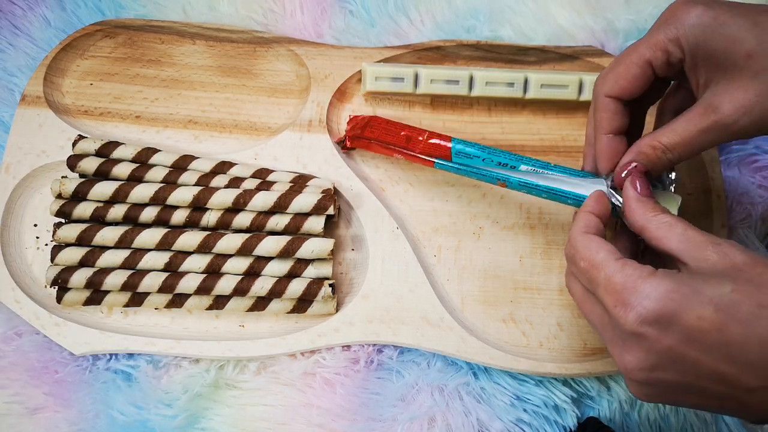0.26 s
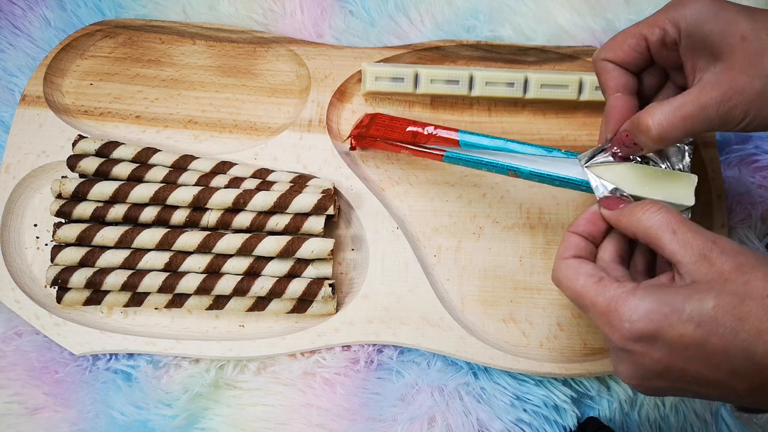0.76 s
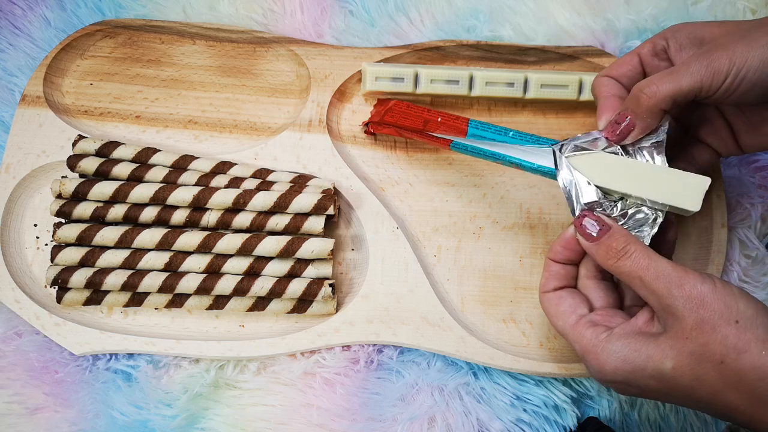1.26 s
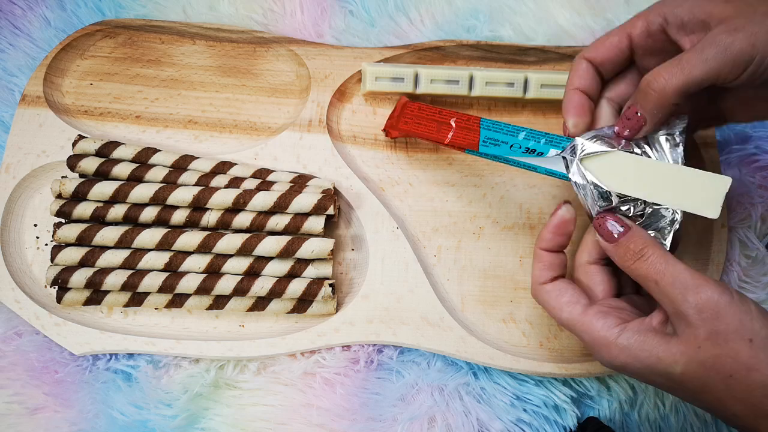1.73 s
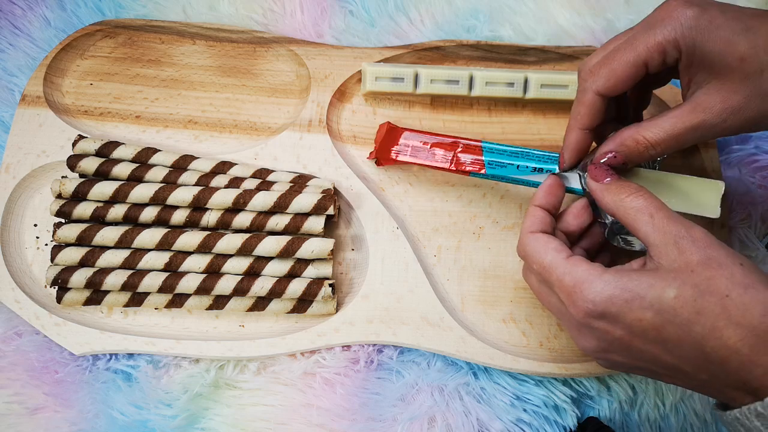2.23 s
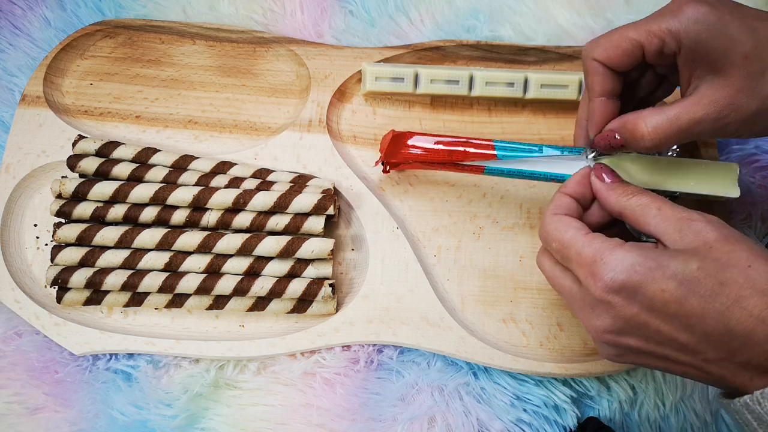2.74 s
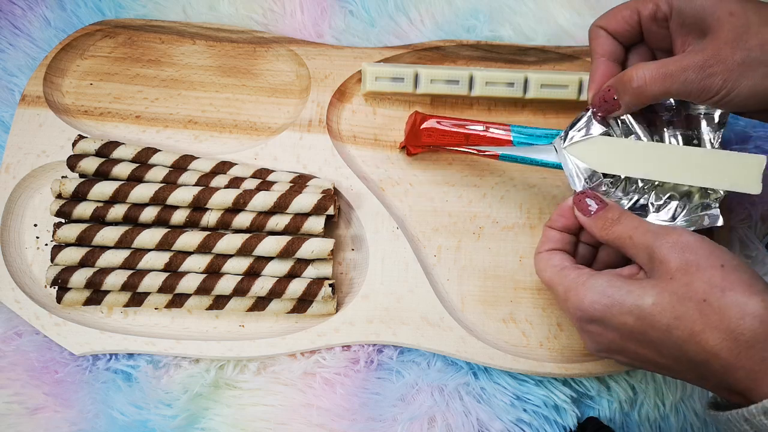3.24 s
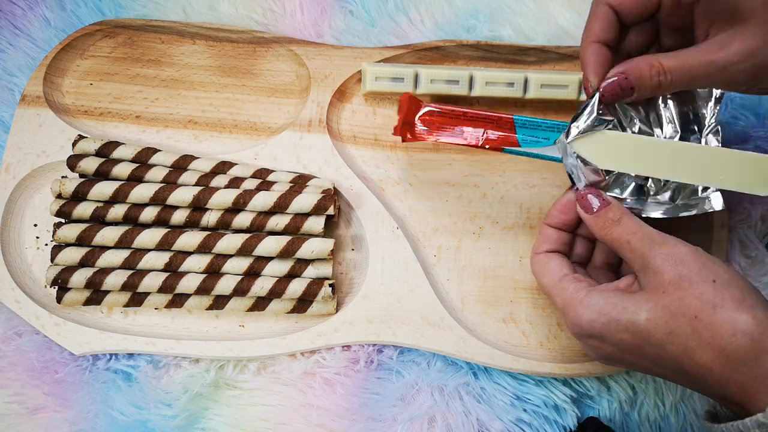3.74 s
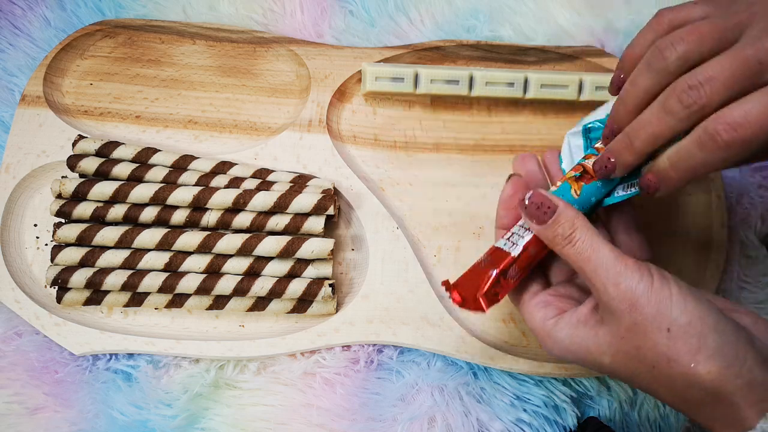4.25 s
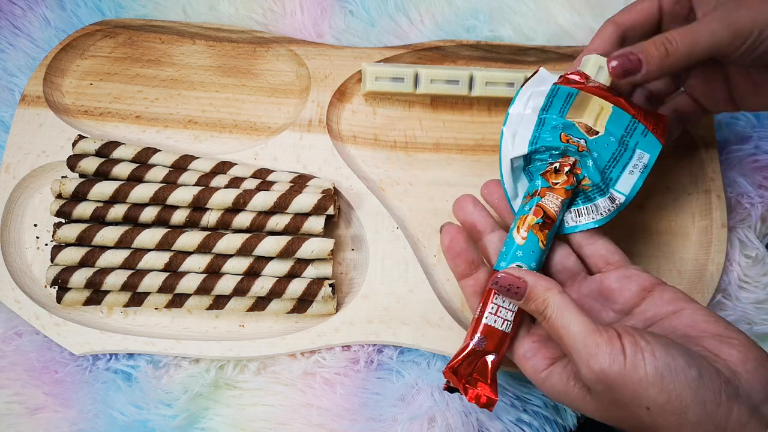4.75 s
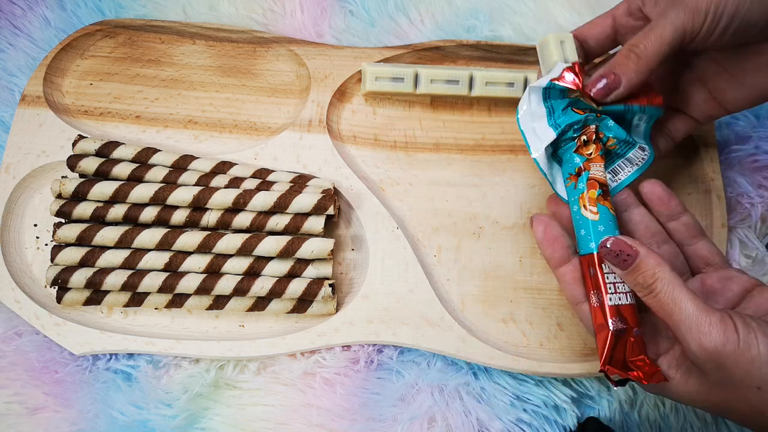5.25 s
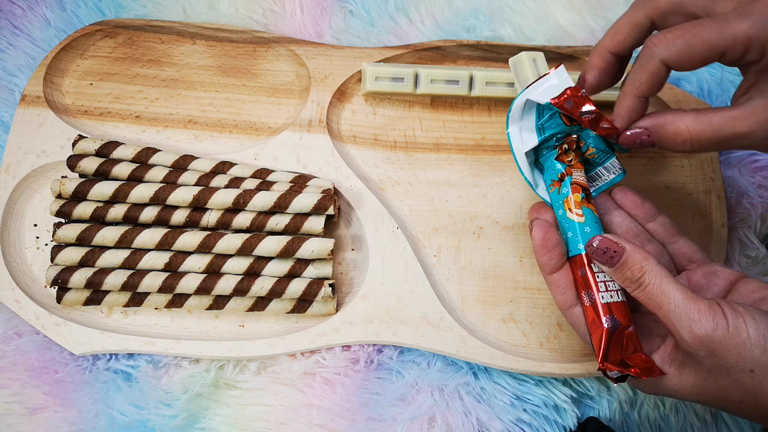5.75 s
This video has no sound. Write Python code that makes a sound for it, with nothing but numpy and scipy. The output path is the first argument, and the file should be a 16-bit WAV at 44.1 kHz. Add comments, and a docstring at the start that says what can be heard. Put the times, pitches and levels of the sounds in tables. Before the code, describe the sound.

Crisp dry snaps and fine ticking of metallised film, heard very close in stereo with a short bright room tail. Crinkling builds quickly, the seam tears briefly, loud creases pop around the middle, then a calmer stretch with faint rustles and low handling thuds before a final loud crumple. Beneath it are quiet air and two distant soft dove phrases.

```python
"""Sharp snaps and fine crackle, close to a stereo microphone in a small room: two hands peel a stiff
metallised wrapper off a chocolate bar. Creases flip with a crack and a short ring, tiny wrinkles tick
in between, and the seam tears once in a quick run of ticks. Under it low noise follows the hands as they
press on the table, skin rubs along the bar and fingertips bump a ringing board.
Far outside a dove coos two phrases of gliding, almost pure notes."""
import sys
import numpy as np
from scipy import signal
from scipy.fft import rfft, irfft, next_fast_len
from scipy.io import wavfile
from scipy.ndimage import uniform_filter1d, minimum_filter1d

SR = 44100
rng = np.random.default_rng(int(sys.argv[2]) if len(sys.argv) > 2 else 0)


def pcm_store(signal):
    """Save signal as 16-bit PCM."""
    levels = np.round(np.clip(np.atleast_2d(signal), -1, 1) * 32767)
    wavfile.write(sys.argv[1], SR, levels.astype(np.int16).T)


N = 264157
TIME = np.arange(N) / SR
SNAP_SIZE = 220   # samples in one buckle

# the free facet of film, lower as it opens and purer when taut: start_s, pitch_hz, tautness (0-1)
FACET_CURVE = [(.7, 2014, 0.27), (1.0, 2684, 0.4), (1.15, 2740, 0.95), (1.3, 2400, 1), (1.37, 1860, 0.5),
               (1.45, 1630, 0.55), (1.57, 1540, 0.71), (1.7, 1580, 0.05), (2.2, 1792, 0), (3.1, 1920, 0.38),
               (5.7, 1460, 0.01)]


def from_db(db):
    """Decibels to gain."""
    return 10 ** (np.asarray(db) / 20)


def rms_one(x):
    """Each row scaled to rms 1."""
    return x / np.sqrt(np.mean(x ** 2, axis=-1, keepdims=True) + 1e-20)


def at_time(rows, t):
    """The columns of a curve at times t."""
    s, *columns = np.transpose(rows)
    return [np.interp(t, s, c) for c in columns]


def at_hz(points, hz):
    """A spectrum read on a log-frequency axis."""
    f, value = np.transpose(points)
    return np.interp(np.log(hz + 1e-3), np.log(f), value)


def band(x, low_hz, high_hz, order=2):
    """Butterworth band-pass."""
    edges = [low_hz, min(high_hz, SR / 2 - 1)]
    return signal.sosfilt(signal.butter(order, edges, "band", fs=SR, output="sos"), x)


def colour(x, spectrum):
    """Give x a smooth frequency response; minimum phase, so that nothing sounds before a snap."""
    size = 2 * next_fast_len(N // 2 + SNAP_SIZE * 20)
    magnitude = from_db(at_hz(spectrum, np.fft.rfftfreq(size, 1 / SR)))
    cepstrum = irfft(np.log(magnitude))
    # keeping only the causal half of the cepstrum makes the phase minimum
    response = np.exp(2 * rfft(cepstrum[:size // 2], size) - cepstrum[0])
    return irfft(rfft(x, size) * response, size)[..., :N]


def held_db(rows, t, attack_s, release_s, resting_db):
    """Levels at times t of moves that build up, hold and let go; one result for each resting level given."""
    start, end, *columns = np.transpose(rows)[:, :, None]
    build_up = np.clip((t - start) / attack_s, 0, 1)
    power_shape = (build_up * np.exp(-np.maximum(t - end, 0) / release_s)) ** 2
    levels = []
    for db, rest in zip(columns, resting_db):
        power = from_db(db[:, 0]) ** 2 @ power_shape + from_db(rest) ** 2
        levels.append(10 * np.log10(power))
    return levels


def still_air():
    """The quiet of the place: steady coloured noise, independent at each capsule."""
    # relative spectrum of the air: frequency_hz, density_db (per Hz)
    quiet = [(30, -12), (120, -8), (300, -7), (800, -10.5), (2000, -9.5), (8000, -35), (11000, -46.5)]
    return from_db(-67.5) * rms_one(colour(rng.standard_normal((2, N)), quiet))


def dove():
    """Short, long, short: almost pure notes that arch and sink, wavering a little with distance."""
    # the notes: start_s, length_s, first_hz, middle_hz, last_hz, level_db
    notes = [(1.11, 0.12, 515, 537, 500, -66.5), (1.324, 0.47, 512, 528.5, 475, -66),
             (1.94, 0.21, 525, 518, 476, -65.5), (3.627, 0.13, 515, 523, 520, -65.5),
             (3.842, 0.388, 525, 524, 494, -62), (4.482, .16, 525, 508, 497, -65)]
    out = np.zeros(N)
    for start, length, first_hz, middle_hz, last_hz, level_db in notes:
        u = np.clip((TIME - start) / length, 0, 1)
        hz = np.polyval(np.polyfit([0, .5, 1], [first_hz, middle_hz, last_hz], 2), u)
        swell = np.sqrt(2 * np.abs(np.sin(np.pi * u)))
        out += from_db(level_db) * swell * np.sin(2 * np.pi * np.cumsum(hz) / SR)
    waver = 1 + .25 * rms_one(band(rng.standard_normal((2, N)), 10, 20))
    return out * waver * from_db([[-1.5], [1.5]])     # a little louder on the right


def rumble(spectrum, side_db):
    """Coloured noise with its slow swells evened out; side_db sets how far the capsules differ."""
    mid, side = rms_one(colour(rng.standard_normal((2, N)), spectrum))
    swell = np.sqrt(uniform_filter1d(mid ** 2, size=SR // 8) + 1e-6)
    return mid / swell + from_db(side_db) * side * [[1], [-1]]


def handling():
    """The hands rock the table, thud softly on it and rub along the bar: three noises under moving levels."""
    # the hands press on the table: start_s, end_s, sway_db, thud_db
    presses = [(-0.05, 0.04, -40.5, -47), (0.2, 0.42, -48.5, -48.5), (0.6, 0.96, -45.5, -52),
               (1.22, 1.68, -43.5, -55), (1.95, 2.33, -45, -52), (2.76, 3.22, -48, -55),
               (3.33, 3.64, -39.5, -57), (3.77, 4.08, -37, -51.5), (4.38, 4.72, -44, -48),
               (4.9, 5.16, -44.5, -53), (5.26, 5.53, -52, -51), (5.67, 5.82, -39, -32.5),
               (5.87, 5.99, -43, -40)]
    # skin rubbing along the bar: start_s, length_s, level_db
    rubs = [(0.244, 0.15, -65), (2.807, 0.15, -60), (4.41, 0.12, -61.5), (5.638, 0.19, -52),
            (5.778, 0.12, -52.5), (5.913, 0.1, -49.5)]
    # relative spectra of rocking, thudding and rubbing: frequency_hz, density_db (per Hz)
    sway_spectrum = [(12, -4.5), (22, 5), (28, 16), (36, 7), (50, -14.5), (70, -54), (200, -88.5)]
    thud_spectrum = [(40, -38.5), (60, -7.5), (75, 0.5), (88, -7), (102, -7.5), (113, -13.5), (128, -7.5),
                     (152, -21.5), (175, -27), (200, -21), (250, -23), (320, -32.5), (600, -48.5),
                     (1200, -58.5), (5000, -82.5)]
    skin_spectrum = [(120, -9.5), (280, -4.5), (430, -3), (700, -10.5), (1200, -11.5), (5000, -36.5),
                     (12000, -48.5)]
    sway_db, thud_db = held_db(presses, TIME, attack_s=0.043, release_s=0.045, resting_db=[-51.5, -56])
    strokes = np.zeros(N)
    for start, length, db in rubs:
        strokes += from_db(db) * np.sin(np.pi * np.clip((TIME - start) / length, 0, 1))
    swaying = from_db(sway_db) * rumble(sway_spectrum, side_db=-41.5)
    thudding = from_db(thud_db) * rumble(thud_spectrum, side_db=-37)
    rubbing = strokes * rumble(skin_spectrum, side_db=-1.5)
    return swaying + thudding + rubbing


def bumps():
    """Soft blows of the fingertips set the wooden board ringing for a few cycles."""
    # a fingertip bumps the board: start_s, level_db
    blows = [(3.175, -49), (4.441, -52), (5.70, -44), (5.749, -37.5), (5.83, -43)]
    board_hz, attack_s, decay_s = 145.7, 0.0076, .035
    s, level_db = np.transpose(blows)
    t = np.maximum(TIME - s[:, None], 0)
    ring = np.sin(2 * np.pi * board_hz * t) * (1 - np.exp(-t / attack_s)) * np.exp(-t / decay_s)
    return from_db(level_db) @ ring


def band_levels(flap_db, treble_db, brightness_db):
    """Levels of flap, crack, sizzle and air: brightness moves treble from crack to sizzle and raises the air."""
    crack_db = treble_db - 10 * np.log10(1 + from_db(brightness_db) ** 2)
    sizzle_db = crack_db + brightness_db     # crack and sizzle together carry the treble level
    air_db = treble_db - 11.5 + 0.79 * brightness_db
    return [flap_db, crack_db, sizzle_db, air_db]


def buckles(times, flap_hz, ridge_hz, levels_db, pan_db, flap_decay_s, crack_decay_s, ridge_decay_s,
            ridge_db, alike, lead_s):
    """Each crease flips in about a millisecond: the treble cracks, its facet and stiff ridge ring briefly."""
    # bands of crack, sizzle and air: low_hz, high_hz
    crack_bands = [(2500, 5500), (5500, 10000), (10000, 15500)]
    t = np.arange(SNAP_SIZE) / SR
    # axes: crease, band, (shared, left, right), sample
    chance = rng.standard_normal((len(times), 4, 3, SNAP_SIZE))
    alike = np.clip(alike, 0, 1)     # share of noise power common to both capsules
    grit = np.sqrt(alike) * chance[:, :, :1] + np.sqrt(1 - alike) * chance[:, :, 1:]
    fade_out = np.minimum(1, 10 * (1 - t / t[-1]))
    onset = (1 - np.exp(-(t / 0.0004) ** 2)) * fade_out

    flap_tone = np.sin(2 * np.pi * (flap_hz[:, None, None] * t + chance[:, 0, :1, :1]))
    flap_noise = 0.52 * rms_one(band(grit[:, 0], 900, 3060))
    flap = (flap_tone + flap_noise) * onset * np.exp(-t / flap_decay_s)
    shapes = rms_one(band(flap, 752, 3600, order=4)) * from_db(levels_db[0])[:, None, None]

    ridge_tone = np.sin(2 * np.pi * (ridge_hz[:, None, None] * t + chance[:, 1, :1, :1]))
    ridge = ridge_tone * onset * np.exp(-t / ridge_decay_s)
    flip = onset * (np.exp(-t / crack_decay_s) + 0.064)     # the sheet shivers on after the flip
    for k, (edges, level_db) in enumerate(zip(crack_bands, levels_db[1:])):
        crack = band(grit[:, k + 1] * flip + from_db(ridge_db) * ridge, *edges, order=4)
        shapes = shapes + rms_one(crack) * from_db(level_db)[:, None, None]

    out = []
    lead = lead_s + .00003 * chance[:, 1, 0, -1]     # the wrapper is a little nearer the right capsule
    for channel, side in enumerate((1, -1)):     # left, right
        first = np.round((times - .0001 + side * lead / 2) * SR).astype(int)
        at = first[:, None] + np.arange(SNAP_SIZE)
        panned = shapes[:, channel] * from_db(side * pan_db / 2)[:, None]
        out.append(np.bincount(np.maximum(at, 0).ravel(), panned.ravel(), N)[:N])
    return np.array(out)


def crackle(count=2300):
    """Hundreds of tiny wrinkles a second give way, most weak, a few strong; taut film shares one pitch."""
    # the fingers grip and work the film: start_s, end_s, flap_db, treble_db, brightness_db (sizzle over crack)
    grips = [(0.029, 0.086, -51, -46.5, 0), (0.216, 0.333, -59, -54.5, -1.5),
             (0.424, 0.468, -54, -46.5, -5), (0.609, 0.63, -70.5, -34.5, 17), (0.63, 0.736, -43, -36, -11),
             (0.789, 0.99, -39, -36.5, 0), (0.968, 1.146, -37.5, -28.5, 5), (1.127, 1.318, -47.5, -42, -2),
             (1.342, 1.583, -42.5, -37, -0.5), (1.647, 1.844, -39, -35.5, -0.5),
             (1.852, 1.972, -33.5, -30.5, -8), (2.092, 2.238, -45.5, -41, -3.5),
             (2.404, 2.47, -61.5, -59, -0.5), (2.592, 2.758, -58.5, -48.5, 5), (2.767, 2.914, -43, -38, 2),
             (2.96, 3.15, -44.5, -38, -2), (3.16, 3.248, -54.5, -57, 1.5), (3.31, 3.457, -56, -39.5, 0),
             (3.602, 3.627, -46.5, -38, -1), (3.747, 3.908, -49.5, -41.5, 4),
             (4.127, 4.168, -81.5, -59, -11.5), (4.356, 4.491, -54, -62.5, 2.5),
             (4.636, 4.72, -63.5, -61, 2), (4.865, 4.949, -54.5, -46, 8), (5.063, 5.124, -68, -61.5, 6),
             (5.136, 5.262, -55, -65, -1), (5.267, 5.394, -41.5, -40.5, 1), (5.438, 5.515, -53.5, -58, 9),
             (5.646, 5.681, -33, -33.5, 2), (5.81, 5.99, -35.5, -37.5, 4.5)]
    idle_db = -78     # film that is only held still ticks faintly
    s = (np.arange(count) + rng.uniform(-1, 1, count)) / count * N / SR
    size, pitch, overtone, tilt, pan = rng.standard_normal((5, count))
    size_db = 6.55 * np.minimum(size, 1.8) - 8.5
    grip_db = held_db(grips, s, attack_s=0.012, release_s=0.028, resting_db=[idle_db, idle_db])
    flap_db, treble_db = grip_db + size_db
    start, end, *_, grip_brightness_db = np.transpose(grips)
    brightness_db = np.interp(s, (start + end) / 2, grip_brightness_db) + 2.5 * tilt
    facet_hz, taut = at_time(FACET_CURVE, s)
    slack = 1 - np.clip(taut, 0, 1)     # slack film scatters the pitches
    flap_hz = facet_hz * np.exp(0.34 * slack * np.maximum(pitch, -1.3))
    ridge_hz = facet_hz * 1.85 * np.exp(0.44 * slack + (0.067 + .3 * slack) * overtone)
    levels_db = band_levels(flap_db - 3.1 * tilt, treble_db, brightness_db)
    return buckles(s, flap_hz, ridge_hz, levels_db, 2.0 * pan, flap_decay_s=0.0037, crack_decay_s=0.00075,
                   ridge_decay_s=0.0027, ridge_db=-12, alike=0.33, lead_s=.00005)


def tear():
    """The seam lets go in nearly even slips that slow down as the rip runs out."""
    # the rip: start_s, rate_hz (slips per second), level_db (before each band's offset)
    rip = [(1.04, 330, -29.5), (1.062, 240, -35.5), (1.085, 180, -25.5), (1.122, 140, -37)]
    t = TIME[(TIME > rip[0][0]) & (TIME < rip[-1][0])]
    per_s, level_db = at_time(rip, t)
    slips = np.flatnonzero(np.diff(np.floor(np.cumsum(per_s) / SR)))     # one at each whole count
    late, size, pitch = rng.standard_normal((len(slips), 3)).T
    flap_hz = at_time(FACET_CURVE, t[slips])[0] * np.exp(.06 * pitch)
    band_offsets_db = np.array([[-14], [-7], [-3], [-9]])     # flap, crack, sizzle, air
    levels_db = level_db[slips] + 3.4 * size + band_offsets_db
    return buckles(t[slips] + 0.00073 * late, flap_hz, 1.4 * flap_hz, levels_db, np.zeros(len(slips)),
                   flap_decay_s=0.0022, crack_decay_s=0.0016, ridge_decay_s=0.0011, ridge_db=-6,
                   alike=0.27, lead_s=.00006)


def snaps():
    """The big creases buckle one by one, each with its own facet and ridge pitch."""
    # creases buckling: start_s, flap_hz, ridge_hz, flap_db, treble_db, brightness_db (sizzle over crack),
    # pan_db (left over right)
    creases = [(0.0589, 2150, 8040, -44.5, -36.5, 1, -1), (0.2038, 2120.0, 2900.0, -49.5, -53.5, -10, 1),
               (0.2245, 1390, 4340, -55, -41.5, -10, 0), (0.403, 2200, 2900.0, -46, -41.5, -2, -2),
               (0.4582, 2670, 7680, -39.5, -25.5, 8.5, -1), (0.6366, 2070, 2840, -31.5, -34.5, -20, 2),
               (0.6541, 2220, 7340, -47.5, -23.5, 7, -9), (0.6571, 2070.0, 7900, -25.5, -19.5, 1, -3),
               (0.665, 2200, 3450, -30.5, -19, 5, 15), (0.7099, 2560, 2800, -26.5, -21.5, -10, -4),
               (0.722, 2400.0, 7420, -46.5, -19, 6, -5), (0.8097, 2300, 2920, -30, -36.5, 10, -1),
               (0.844, 2630.0, 5820, -33.5, -21.5, 4.5, 2), (0.8882, 2100, 5940, -27, -25, 6, 1),
               (0.9084, 2100, 5700, -44, -26.5, 8, 7), (0.932, 2340.0, 2950, -27.5, -27.5, 8, 2),
               (0.9754, 2580, 2930, -31, -32, -15, -11), (1.0251, 2710, 2950, -19.5, -19, -7, -7.5),
               (1.0351, 2420.0, 5530, -25.5, -19.5, 7, -1), (1.1245, 2110, 5700, -28, -24, 0, -2),
               (1.1828, 2160, 5470, -32.5, -24.5, 17.5, 0), (1.2207, 2490, 8230, -31.5, -19.5, 6.5, 3),
               (1.2418, 2450, 4500, -35.5, -27, -3, -8), (1.2611, 2240, 7350, -29.5, -32, 2, 2),
               (1.278, 2220, 7750, -39, -26.5, -1.5, -1), (1.3359, 2570, 7870, -38, -20, 4, -2),
               (1.3613, 1950, 5940, -33.5, -24, 6, 2), (1.4408, 1740, 7630, -20.5, -21, 7, 0),
               (1.4788, 1500, 7450, -27.5, -39, 5, 2), (1.535, 1550, 5130, -30.5, -29, -1, -3),
               (1.5482, 1480, 8470, -32, -25, 8, 1), (1.582, 2120.0, 8250, -37, -27, 6, 1.5),
               (1.6308, 2370, 5400, -41, -24, 2.5, -4.5), (1.6606, 2570, 3000, -34, -31, -18, 8.5),
               (1.7441, 2040, 7100.0, -34.5, -27, -2, 1), (1.8013, 1700, 3770, -28, -25.5, 1, 0),
               (1.811, 2270, 7460, -50, -28.5, 15, -4), (1.8979, 1200, 7350, -25.5, -25, 12, -2),
               (1.911, 2140, 3640, -30.5, -26, -10, -7), (2.0337, 2140, 5900, -35, -32, -8, 0),
               (2.0812, 2080, 5740, -35, -30, 4, 0), (2.0862, 2240, 5700, -33.5, -25.5, -4, -1.5),
               (2.2209, 2270, 2770, -31, -28.5, -11, -1), (2.2326, 2350, 2880, -35, -36, 10, 6.5),
               (2.492, 2050.0, 3540, -49.5, -49, -22, -10), (2.5127, 2090, 3400, -49.5, -41, -22, -3),
               (2.577, 2280.0, 8400, -72, -49, 8, -10), (2.656, 1810.0, 4170, -36, -37.5, -3, 4),
               (2.662, 2610, 7860, -37.5, -24, 3.5, -1), (2.7529, 1772, 2900.0, -32, -58, -2, -1.5),
               (2.791, 2140, 8200, -33.5, -21.5, 2.5, -3), (2.8132, 2330, 5700, -23, -17.5, 2, -1),
               (2.8401, 2130, 8700, -24, -13, 7.5, 1.5), (2.8467, 2340, 2820, -16.5, -19, -3, 2.5),
               (2.977, 1760, 4880, -27, -20.5, -1.5, 0.5), (3.008, 2490.0, 8200, -53, -19.5, 5, -4.5),
               (3.0269, 2140.0, 2690, -13, -14.5, -6, 1), (3.0433, 1810, 5600.0, -36, -21, 1, 1),
               (3.0824, 2410, 2960, -21, -23.5, 3, -2), (3.0974, 2490, 3060, -24, -18.5, -2.5, 0.5),
               (3.1723, 2010, 2870, -27.5, -28.5, -9.5, -1), (3.3134, 2680.0, 4600.0, -41, -31.5, -3, -6),
               (3.3292, 2690, 2900.0, -24, -20, 0, -1), (3.384, 2510.0, 5800, -29.5, -19.5, 5.5, 0),
               (3.4173, 2430, 5070, -28, -20, 3.5, 0.5), (3.5479, 2400, 2840, -36, -38, -7, 3),
               (3.594, 2030, 7800.0, -27.5, -20.5, 3, -0.5), (3.7346, 1860.0, 7240, -36, -20.5, 9, 0.5),
               (3.8227, 1830, 7750, -46, -39, 11, -2), (3.8351, 2380, 3900.0, -28.5, -24.5, -11, 0),
               (3.8442, 2160, 2840, -28.5, -29, -4, 0), (3.8877, 2260, 2800, -23, -18.5, -2, 1),
               (3.9825, 1880, 7270, -30, -22.5, 2.5, -5), (4.1283, 2330, 4400, -62, -36.5, -8, 7),
               (4.21, 2550.0, 6000.0, -75, -47, -3, 3.5), (4.355, 2010, 4700, -38, -35.5, -19, -0.5),
               (4.3844, 1455, 4760, -41, -47, -21.5, 2), (4.4485, 1820.0, 2800, -44.5, -53.5, 1, -3),
               (4.4666, 1270.0, 2900.0, -41.5, -65, 2, 3), (4.482, 1655, 5300, -43.5, -48, 6.5, 0.5),
               (4.7108, 1410, 8400.0, -53.5, -44, 7, -0.5), (4.8753, 1910, 8440, -49.5, -23.5, 9, 7),
               (4.9373, 1670, 5740, -36, -42, -8, -5), (4.9549, 1660, 5960, -36, -35.5, -0.5, 0.5),
               (5.139, 1500.0, 7400, -49, -30.5, 7, 1.5), (5.1552, 1620.0, 5780, -40, -28.5, 0, 2),
               (5.1927, 1470, 3600.0, -30.5, -34.5, -6, 1.5), (5.2228, 2450, 6660, -33, -20.5, 5, 1),
               (5.2299, 2270, 6810, -28, -20, 6, 1.5), (5.282, 2540, 2900.0, -27, -26, 1, -0.5),
               (5.3429, 1890.0, 8900, -22.5, -19, 3, 5), (5.4574, 1820, 3020, -33.5, -37.5, -11, -2),
               (5.4988, 2650, 5900.0, -34.5, -28.5, 2, 3), (5.63, 1560, 5030, -39.5, -35.5, -2, 1),
               (5.6668, 1590, 8160, -33, -20.5, 0, -2), (5.7049, 1780, 5900.0, -23, -31.5, -5, 1),
               (5.781, 1780, 4930, -38, -31, -7.5, 3.5), (5.8398, 2040, 7070, -25, -16, 2.5, 5.5),
               (5.9006, 1900, 5800, -28.5, -20, -8, 3), (5.9152, 1640.0, 3000.0, -26, -25, -10, -3),
               (5.9473, 1470, 3760, -20, -13, -7, 1), (5.975, 2440.0, 2900.0, -25, -24, 1, -2)]
    s, flap_hz, ridge_hz, flap_db, treble_db, brightness_db, pan_db = np.transpose(creases)
    levels_db = band_levels(flap_db, treble_db, brightness_db)
    return buckles(s, flap_hz, ridge_hz, levels_db, pan_db, flap_decay_s=0.00086, crack_decay_s=0.00035,
                   ridge_decay_s=0.00051, ridge_db=-4.0, alike=0.39, lead_s=.00007)


def room(x, wet_db, first_s):
    """Table and walls answer with a diffuse tail from first_s on, different at each capsule."""
    # decay of the room: frequency_hz, t60_s (time to fall by 60 dB)
    decay_times = [(500, 0.081), (1800, 0.27), (4000, 0.35), (8000, 0.29), (15000, 0.15)]
    t = TIME[:SR // 2]
    hz = np.fft.rfftfreq(len(t), 1 / SR)
    white, tail = rfft(rng.standard_normal((2, len(t)))), 0
    edges = np.geomspace(300, SR / 2, 9)
    for low, high in zip(edges, edges[1:]):
        t60 = at_hz(decay_times, np.sqrt(low * high))
        noise = irfft(white * ((hz >= low) & (hz < high)), len(t))
        tail = tail + noise * np.exp(-np.log(1000) * t / t60)
    tail = tail * np.clip(t / first_s - 1, 0, 1)
    return from_db(wet_db) * signal.fftconvolve(x, rms_one(tail) / np.sqrt(len(t)), axes=1)[:, :N]


def wrapper():
    """All the buckling film with its room, coloured differently at each capsule."""
    # colour of the film at the left and the right capsule: frequency_hz, gain_db
    left_colour = [(300, 8), (750, -12), (1200, -5), (1700, 1.5), (3000, -6.5), (4300, -1.5), (5700, -2),
                   (7500, 5), (8600, -4.5), (9400, -5), (10300, -13), (14800, -10), (16000, -31)]
    right_colour = [(300, 15), (750, -8.5), (1200, -3.5), (1700, 0.5), (3000, -4.5), (4300, -5),
                    (5700, -1.5), (7500, -4), (8600, -1), (9400, -0.5), (10300, -3.5), (14800, -9),
                    (16000, -7.5)]
    film = snaps() + crackle() + tear()
    left, right = film + room(film, wet_db=-9, first_s=0.0027)
    return np.array([colour(left, left_colour), colour(right, right_colour)])


def scene():
    """Wrapper and its room over the handling noise, the dove and the still air."""
    return still_air() + dove() + handling() + bumps() + wrapper()


def record(dry):
    """The top is cut at 16 kHz; a fast limiter holds the sharpest peaks under full scale."""
    ceiling, dip_size = .95, 130     # full scale = 1; samples over which the gain dips
    top_cut = signal.butter(20, 16000, fs=SR, output="sos")
    x = signal.sosfilt(top_cut, dry)
    gain = minimum_filter1d(ceiling / np.maximum(np.abs(x), ceiling), size=dip_size)
    return x * uniform_filter1d(gain, size=dip_size)


dry = scene()
out = record(dry)
pcm_store(out)
```